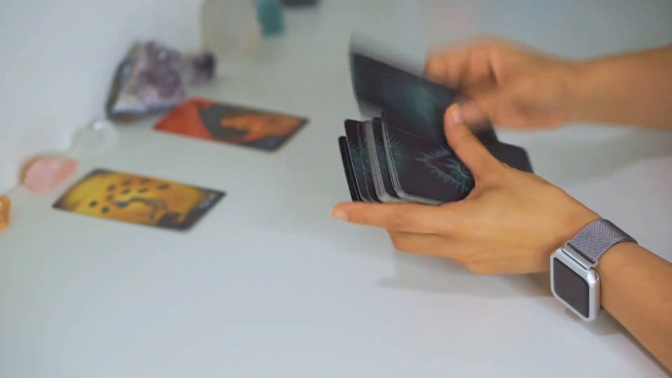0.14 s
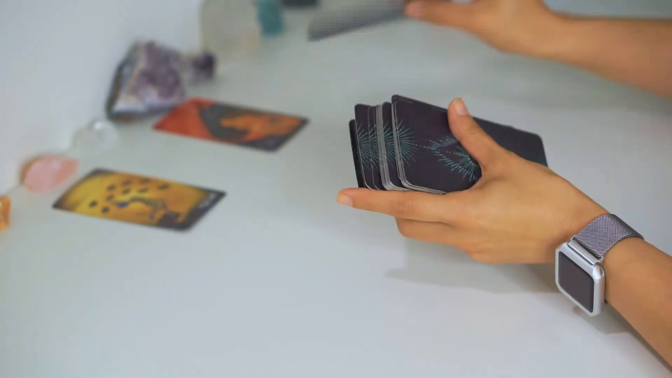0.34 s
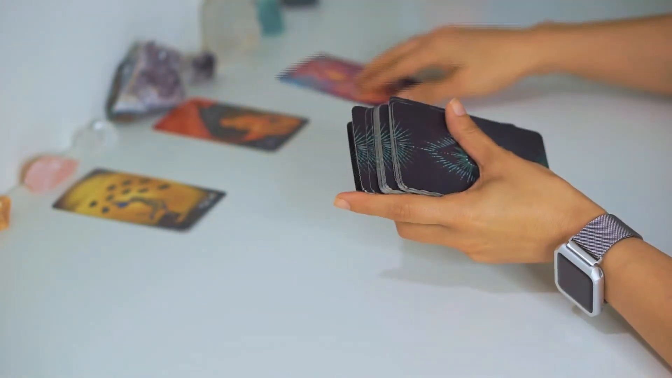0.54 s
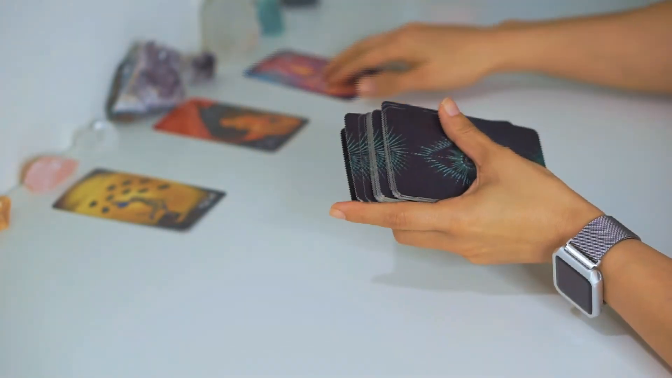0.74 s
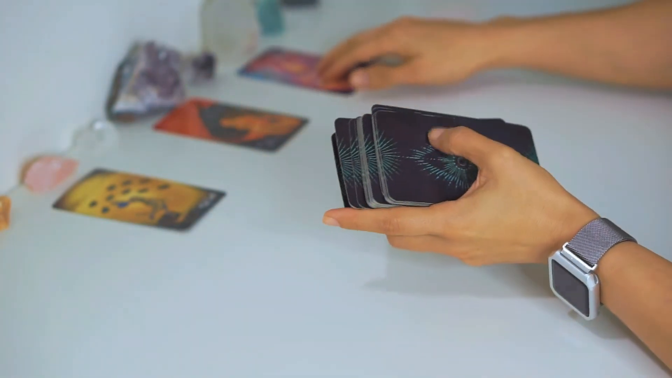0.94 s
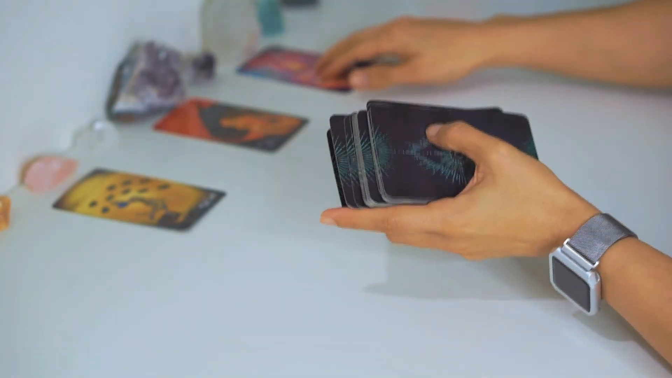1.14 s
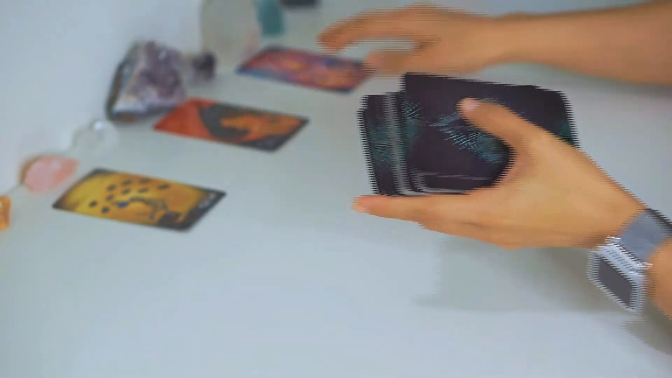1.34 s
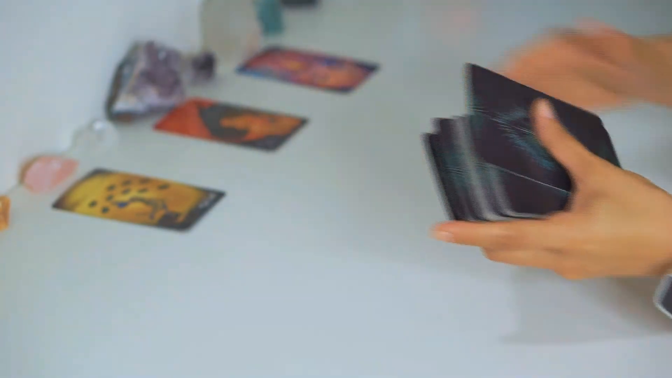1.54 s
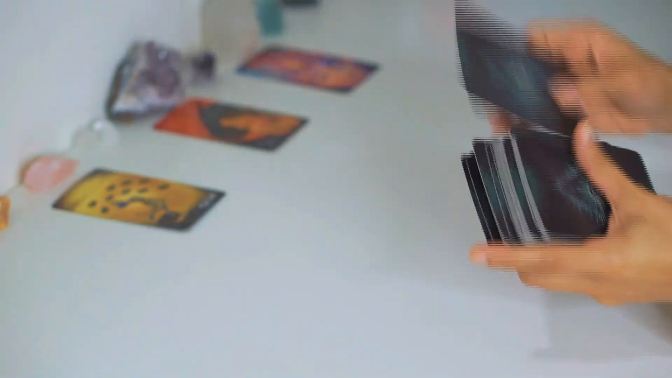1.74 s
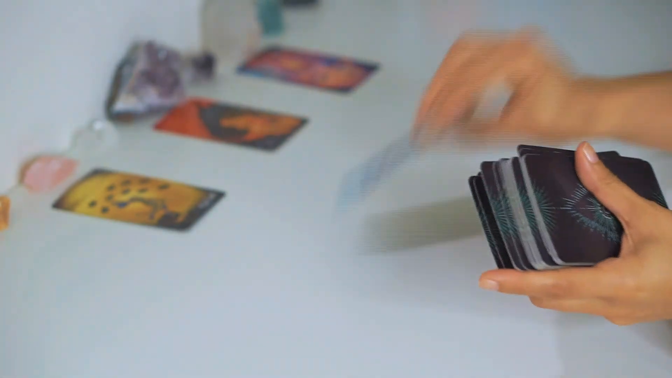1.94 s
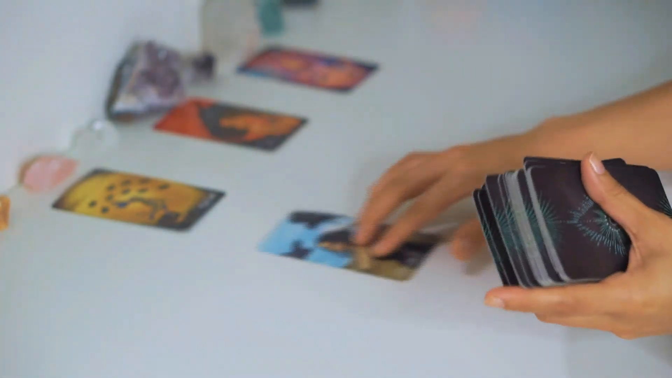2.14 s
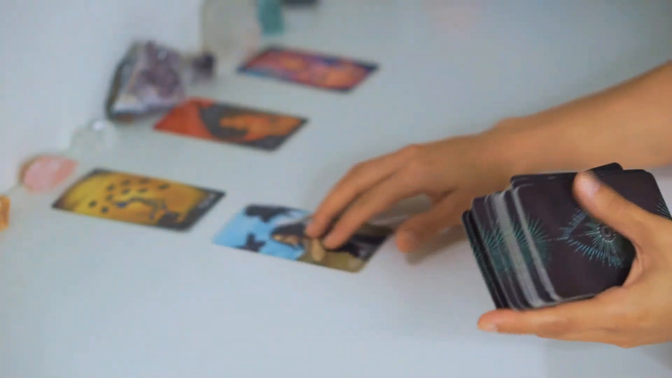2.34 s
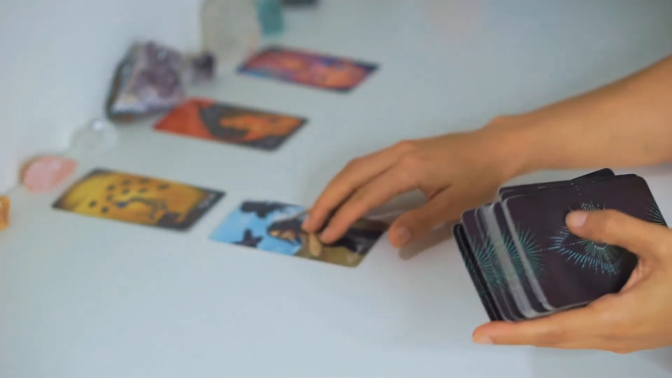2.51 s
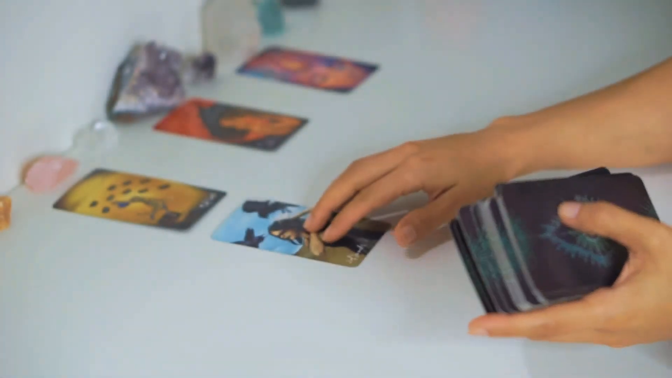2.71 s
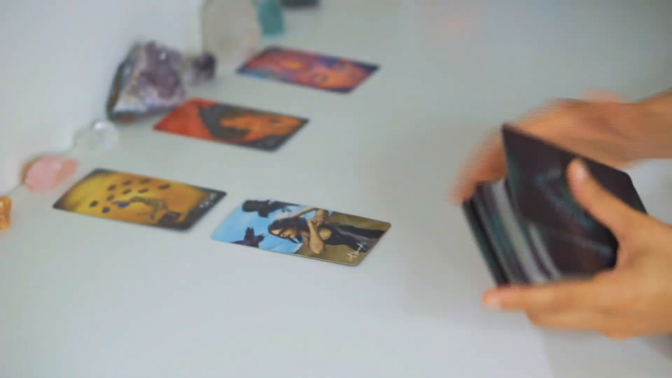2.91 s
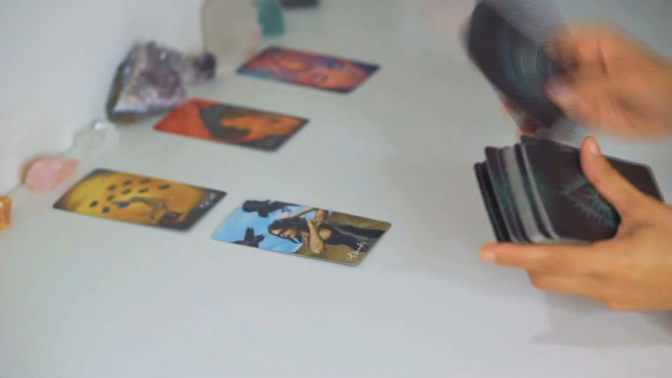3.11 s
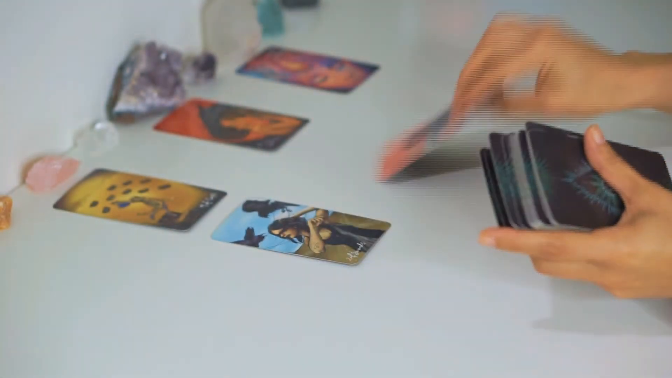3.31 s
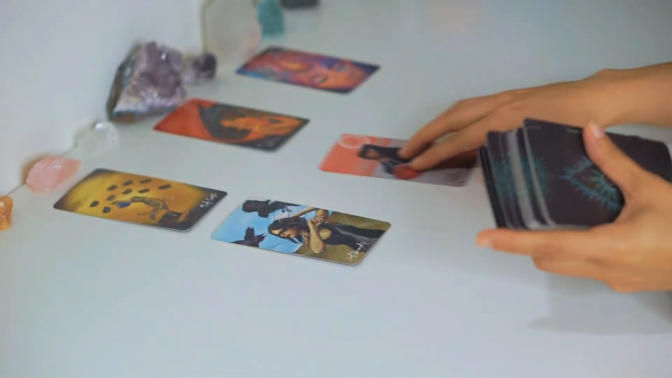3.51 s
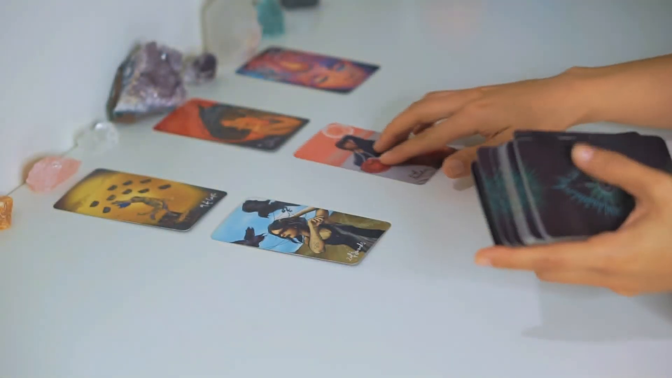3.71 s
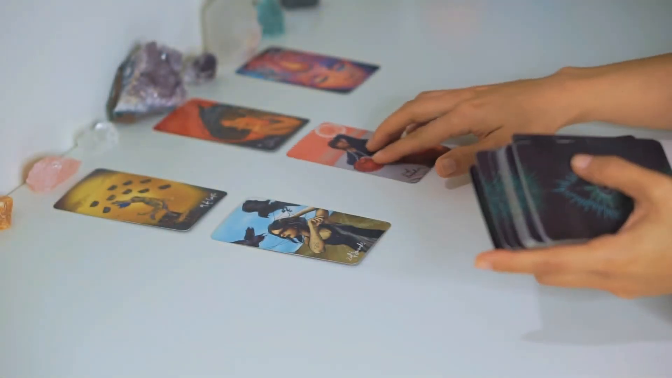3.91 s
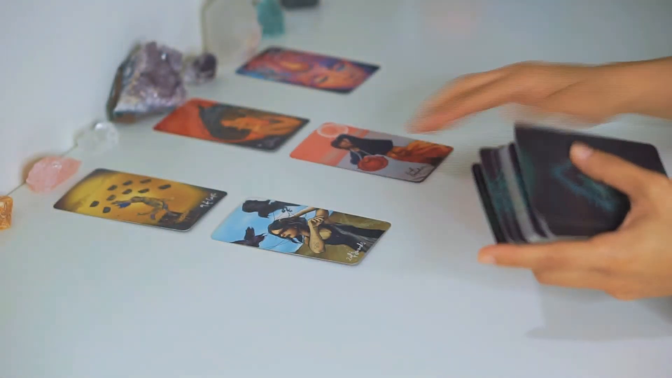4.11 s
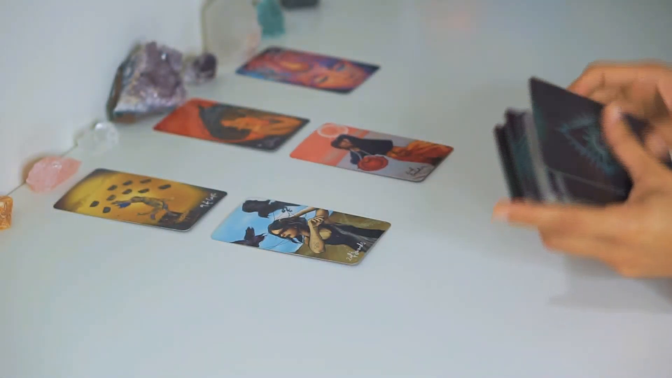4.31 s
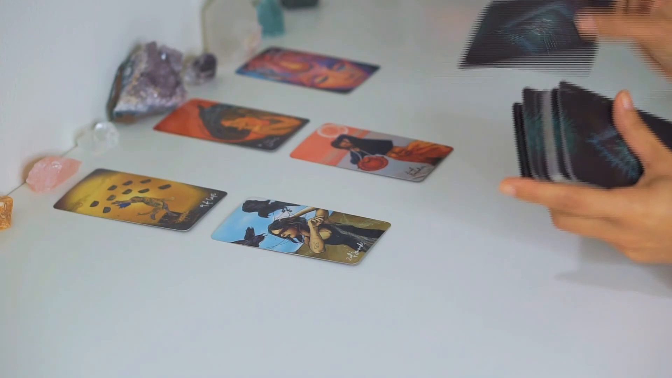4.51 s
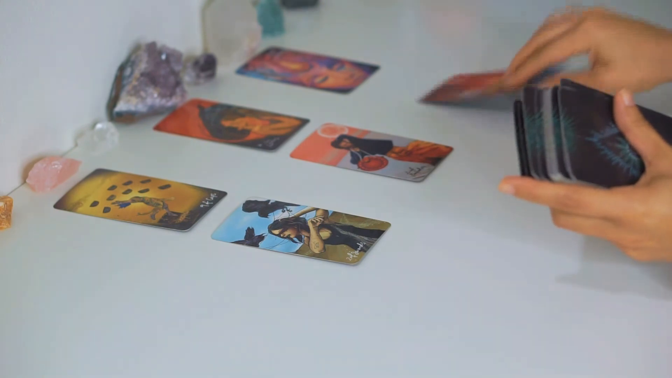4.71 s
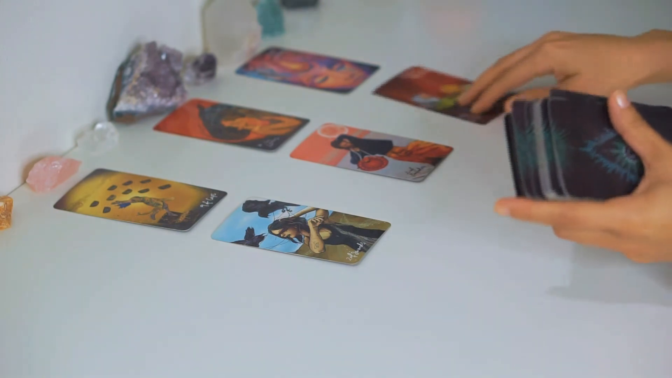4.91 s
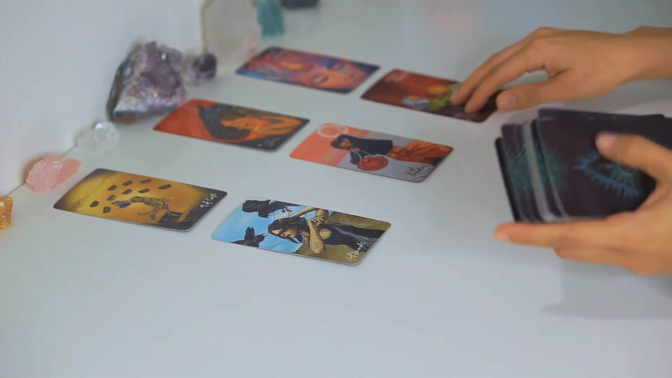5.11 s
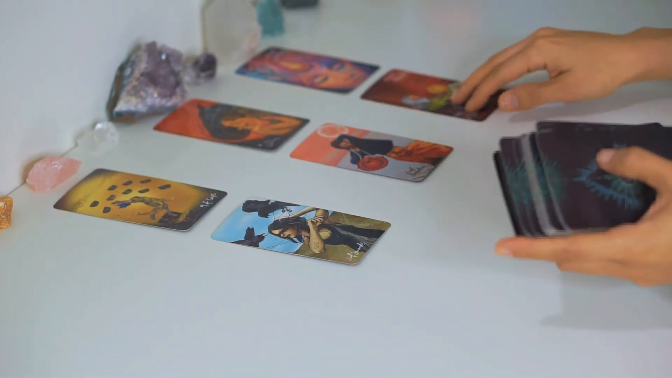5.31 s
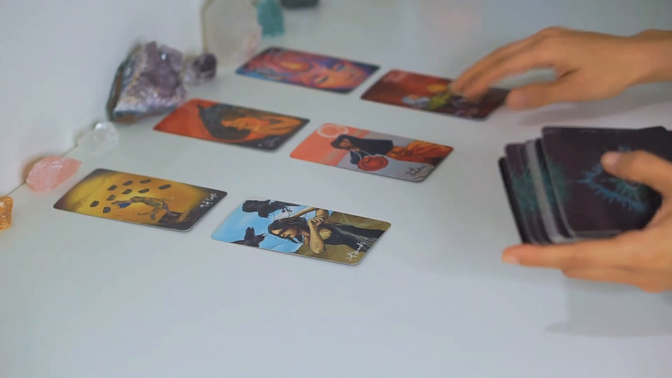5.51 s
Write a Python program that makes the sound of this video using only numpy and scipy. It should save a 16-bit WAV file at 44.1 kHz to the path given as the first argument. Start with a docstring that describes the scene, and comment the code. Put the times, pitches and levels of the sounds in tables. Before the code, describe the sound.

In a small, bare, quiet room, a hand deals four stiff cards from a deck. Each hisses briefly off the stack, snaps sharply free, then lands a quarter second later with a slap on a hard table and is slid softly into place. Soft low thuds come from the tabletop under the hand. Close, mono microphone; short noisy echoes, faint rumble and hiss behind.

```python
"""Cards are dealt one by one onto a hard table in a small, bare, quiet room.
Each card hisses off the deck, snaps free of the thumb, slaps down and is slid into place.
Snaps and slaps are short cracks of noise, hisses are grainy noise, whistles are narrow bands of noise.
The table top booms softly in low sine tones under the hand, and noisy echoes answer the cards.
A low rumble and a faint, even hiss lie behind it all."""
import sys
import numpy as np
from scipy import signal
from scipy.fft import rfft, irfft, next_fast_len
from scipy.io import wavfile
from scipy.ndimage import uniform_filter1d, map_coordinates

SR = 44100
rng = np.random.default_rng(int(sys.argv[2]) if len(sys.argv) > 2 else 0)


def waveform_to_disk(signal):
    """Save audio, clipped to [-1, 1], as 16-bit WAV at the path in sys.argv[1]."""
    frames = np.transpose(np.atleast_2d(signal))
    scaled = np.clip(frames, -1, 1) * 32767
    samples = np.round(scaled).astype(np.int16)
    wavfile.write(sys.argv[1], SR, samples)


N = 244755

# a card is drawn off the deck: start t/s, end t/s, hiss at full speed before mixing/dB, first touch level/dB
PULLS = [(.257, 0.373, -46.5, -71), (1.835, 1.952, -41.5, -83.5), (3.182, 3.303, -42, -72),
         (4.48, 4.616, -44.5, -64.5)]
# a card lands, edge first and then flat: t/s, level/dB, treble/dB, time from edge to flat/s
TAPS = [(0.624, -47.5, -8, 0.0031), (2.191, -40, -2, .0055), (3.511, -47, -4, .002),
        (4.8572, -41.5, 0, .002)]
# fingers press the landed card and push it into place:
# press t/s, stop t/s, press level/dB, hiss before mixing/dB, whistle f/Hz
SLIDES = [(.709, 0.942, -47.5, -56, 2858), (2.282, 2.567, -48.5, -51.5, 4420),
          (3.604, 3.904, -46.5, -51.5, 4350), (4.985, 5.122, -58.5, -58, 3720)]


def amp(db):
    """Turn decibels into a plain multiplier."""
    return 10 ** (np.asarray(db) / 20)


def unit(x):
    """Scale a sound to an average (RMS) strength of 1."""
    return x / np.sqrt(np.mean(x ** 2) + 1e-20)


def along(points, hz):
    """Read a curve of (f/Hz, value) points, drawn on a logarithmic frequency axis."""
    f, v = np.transpose(points)
    return np.interp(np.log(hz + 1), np.log(f + 1), v)


def bumps(peaks, hz):
    """Add up the gains in dB of resonances given as (f/Hz, width/Hz, gain/dB)."""
    return sum(db / (1 + (2 * (hz - centre) / width) ** 2) for centre, width, db in peaks)


def coloured(x, gain_db):
    """Filter x with the gain gain_db(hz), without any sound arriving early."""
    size = 2 * next_fast_len(len(x) // 2 + 4096)
    log_gain = np.log(amp(gain_db(np.fft.rfftfreq(size, 1 / SR))))
    # folding the cepstrum forward in time gives the minimum-phase filter
    cepstrum = irfft(log_gain)
    cepstrum[1:size // 2] *= 2
    cepstrum[size // 2 + 1:] = 0
    response = np.exp(rfft(cepstrum))
    return irfft(rfft(x, size) * response, size)[:len(x)]


def levelled(x, order=150):
    """Even out the broad humps of a sound's spectrum, smoothing over order bins."""
    power = np.abs(uniform_filter1d(np.abs(rfft(x)) ** 2, order)) + 1e-12
    bins_hz = np.fft.rfftfreq(len(x), 1 / SR)
    return coloured(x, lambda hz: np.interp(hz, bins_hz, -10 * np.log10(power)))


def add(track, s, sound):
    """Mix a sound into the track from time s."""
    part = track[round(s * SR):][:len(sound)]
    part += sound[:len(part)]


def wobble(rate, size):
    """Draw a smooth random curve through rate random points a second."""
    points = rng.standard_normal(int(size * rate / SR) + 4)
    return map_coordinates(points, [np.arange(size) * rate / SR])


def cards():
    """Each card snaps, is touched, lands and is pressed: every contact cracks, coloured by resonances."""
    # a card catches and snaps free: t/s, level/dB, body/dB, treble/dB, crack over room/dB, attack/s
    snaps = [(0.335, -42, 11.5, 1, 2.5, .0005), (0.3853, -23, 0, 0, -0.5, 0.00056),
             (1.89, -33, -1, -4, 9, 0.0021), (1.9525, -28, 1.5, -1.5, 4, 0.0021),
             (3.2988, -26.5, -1.5, -9, 1, 0.0013), (4.568, -43, 9, 3.5, -2.5, 0.0017),
             (4.6123, -23.5, 1, 3.5, -4.5, .0002)]
    # colour of a snap: f/Hz, level/dB
    snap_colour = [(60, -36), (110, -18.5), (160, -8), (220, -5.5), (350, -2), (600, -3.5), (1000, -5),
                   (2000, -7.5), (3200, -11.5), (5500, -15.5), (8000, -17), (10000, -23), (13500, -22),
                   (16000, -29)]
    # resonances heard with the deck: f/Hz, width/Hz, gain/dB
    deck = [(362, 58, 5), (500.4, 30, -8.5), (610, 71, 4.5), (895.6, 160, -5.5), (1040, 62, 2.5),
            (1340, 74, 3.5), (1537, 110, -9.5), (1820, 130, 5.5), (2184, 130, 3.5), (8000, 1600, -2.5)]
    # each card is bent differently, so each snap has its own resonances: f/Hz, width/Hz, gain/dB
    bend_1 = [(1170, 51, -5), (2052, 121, -7.5), (8312, 831, 7.5)]
    bend_2 = [(319, 21, 8.5), (434, 34, 2.5), (594, 93, -8.5), (852, 15, 12.5), (1394, 31, 8.5),
              (2750, 280, -5), (3329, 570, 2.5), (6200, 1600, 4)]
    bend_3 = [(230, 160, -5), (367, 71, -14.5), (530, 260, 8), (714, 130, 10), (913, 64, 7), (1010, 60, -3),
              (4370, 500, 7.5)]
    bend_4 = [(297, 25, 8.6), (473, 29, 3.6), (627, 82, 4.5), (1272, 130, 3.6), (1730, 220, 3.9),
              (2818, 280, 6.0), (3830, 960, 8.9), (5530, 280, 6)]
    bend_5 = [(392, 12, 5.5), (558, 48, 3.5), (905, 63, -9), (1000, 39, 8), (1085, 100, -4.5),
              (1620, 95, 5), (1934, 303, 3.5), (3395, 240, 3.5)]
    bend_6 = [(225, 33, 16.5), (308, 40, -12), (8181, 818, 7)]
    bend_7 = [(179.4, 25, -7.5), (214, 43, 8), (274.7, 25, -10), (538, 34, 7.5), (1060, 51, 7.5),
              (1408, 170, -2), (2180, 240, 3), (5470, 1000, 3)]
    bends = [bend_1, bend_2, bend_3, bend_4, bend_5, bend_6, bend_7]
    # colour of the other contacts: f/Hz, level/dB
    tap_colour = [(70, -13), (120, -14), (180, -4.5), (320, -1.5), (600, -3.5), (1200, -5.5), (2300, -6.5),
                  (4000, -12.5), (7500, -17), (10000, -23), (14000, -27), (16000, -33)]
    # resonances heard with the table top: f/Hz, width/Hz, gain/dB
    top = [(170.5, 35, -1.5), (300, 18, 13), (416, 42, 4), (796, 73, -0.85), (896, 75, -5.5),
           (1063, 160, 3), (1482, 36, 4), (1977, 1200, 0.5), (2880, 1700, 3.5), (8550, 858, -1.5)]
    # a finger knocks and scuffs on a card: t/s, level/dB
    knocks = [(1.985, -39.5), (2.348, -62), (3.624, -52.5)]
    edge_share = 0.82  # share of the treble setting that already applies at 4700 Hz
    track = np.zeros(N)

    def tap(db, **touch):
        """A contact heard with the table top."""
        return blow(tap_colour, top, db, **touch, build_s=0.0022, grain_db=2, crinkle_db=-11.0,
                    ripple_db=3.0)

    for (s, db, body_db, treble_db, crack_db, attack_s), bend in zip(snaps, bends):
        add(track, s, blow(snap_colour, [*deck, *bend], db, body_db, edge_share * treble_db, treble_db,
                           crack_db, crack_s=0.0033, attack_s=attack_s, build_s=0.0047,
                           grain_db=0.5, crinkle_db=-6, ripple_db=3.0))
    # first touch of each pull
    for s, _, _, db in PULLS:
        add(track, s, tap(db, body_db=-2.5, edge_db=3.0, air_db=12.5,
                          crack_db=6, crack_s=.002, attack_s=0.00065))
    # landing: first the edge, then the flat card
    for s, db, treble_db, flat_s in TAPS:
        colour = dict(body_db=-1.2, edge_db=edge_share * treble_db, air_db=treble_db)
        add(track, s, tap(db, **colour, crack_db=1.5, crack_s=.0025, attack_s=0.0011))
        add(track, s + flat_s, tap(db, **colour, crack_db=7, crack_s=.0012, attack_s=0.00068))
    # fingers press the card
    for s, _, db, _, _ in SLIDES:
        add(track, s, tap(db, body_db=6.5, edge_db=4, air_db=7.5,
                          crack_db=-7, crack_s=0.0054, attack_s=0.0052))
    for s, db in knocks:
        add(track, s, tap(db, body_db=14.5, edge_db=15, air_db=4.5,
                          crack_db=4.0, crack_s=0.0022, attack_s=0.002))
    return track


def blow(spectrum, peaks, db, body_db, edge_db, air_db, crack_db, crack_s, attack_s, build_s,
         grain_db, crinkle_db, ripple_db):
    """A short crack, then the room; edge_db and air_db set how bright each contact sounds."""
    echoes = tail()
    t = np.arange(len(echoes)) / SR
    # the first echoes arrive in clumps, and merge as they multiply
    clumps = wobble(800, len(t)) + 0.42 * wobble(160, len(t))
    echoes *= amp(grain_db * clumps * np.exp(-t / 0.12))
    echoes *= 1 - np.exp(-t / build_s)
    crack = amp(crack_db) * np.exp(-(t / (2 * crack_s)) ** 2) * rng.standard_normal(len(t))
    # a chatter of single ticks, about 400 a second and fading
    ticks = (rng.random(len(t)) < 400 / SR) * rng.uniform(-1, 1, len(t))
    crack += amp(crinkle_db) * unit(ticks) * np.exp(-t / 0.03)
    # the direct sound is brighter than the echoes
    bright = [(200, -6.5), (1200, -1.5), (4000, 6.5), (12000, 5.0)]
    crack = coloured(crack, lambda hz: along(bright, hz))
    sound = levelled((crack + echoes) * (1 - np.exp(-t / attack_s)))
    touch = [(400, body_db), (1300, 0), (2300, 0), (4700, edge_db), (10000, air_db)]
    # a random ripple varies the colour of each contact
    ripple_hz = 700 + np.cumsum(rng.uniform(.5, 1.5, size=70) * np.linspace(40, 300, num=70))
    heights_db = ripple_db * np.pad(rng.standard_normal(len(ripple_hz) - 2), 1)
    ripple = np.column_stack([ripple_hz, heights_db])

    def colour_db(hz):
        """All the colours of this contact together."""
        return along(spectrum, hz) + along(touch, hz) + bumps(peaks, hz) + along(ripple, hz)

    sound = coloured(sound, colour_db)
    return amp(db) * sound / np.std(sound[:SR // 22])  # level of the first 45 ms


def tail():
    """The room's answer to a click: dense echoes, each frequency dying at its own speed."""
    # how long echoes take to fall by 60 dB: f/Hz, time/s
    room = [(100, 0.53), (260, 0.16), (700, 0.35), (1840, 0.35), (4850, 0.37), (12800, .31)]
    hz, t, z = signal.stft(rng.standard_normal(SR * 3 // 4), SR, nperseg=256)
    fading = amp(-60 * t / along(room, hz)[:, None])
    return signal.istft(z * fading, SR, nperseg=256)[1]


def friction():
    """Cards rub off the deck and along the table, the hand rubs the deck, and slow rubbing sings."""
    # colours of the hisses: f/Hz, level/dB
    pull_colour = [(150, -4), (400, 0.5), (1200, -7.5), (2300, 1.5), (4000, -0.5), (8000, -1.5), (13000, 0),
                   (16000, -3)]
    slide_colour = [(200, -4), (700, -19), (1700, -25), (2500, -8.5), (4500, -1), (8000, -0.5), (10000, -5),
                    (14000, -4.5), (16000, -10.5)]
    grip_colour = [(70, -26), (150, -9), (230, 1), (300, 3.5), (430, -3), (600, -7.5), (1200, -11),
                   (2200, -18), (3200, -21), (3750, -39), (4400, -29.5), (5800, -29.5), (7000, -35),
                   (16000, -39)]
    brush_colour = [(2000, -26), (5000, -8), (8000, -6), (10000, -3), (14500, 2), (16000, -2)]
    # the palm shifts its grip on the deck: start t/s, end t/s, first and last level before mixing/dB
    grips = [(1.36, 1.39, -67.5, -53), (1.391, 1.425, -40, -47)]
    # the thumb brushes the top card: start t/s, end t/s, first and last level before mixing/dB
    brushes = [(2.98, 3.035, -80, -74), (3.04, 3.1, -78.5, -87)]
    track = rub(pull_strokes(), pull_colour, grain_db=1.0, room_db=-2.5, fade_s=.006)
    track += rub(slide_strokes(), slide_colour, grain_db=2.0, room_db=-6.0, fade_s=0.026)
    track += rub(grips, grip_colour, grain_db=4.0, room_db=-3.5, fade_s=0.0067)
    track += rub(brushes, brush_colour, grain_db=4.0, room_db=-1.5, fade_s=.01)
    return track + whistles()


def pull_strokes():
    """Each card's hiss grows as it speeds up on the deck, then holds until the card is free."""
    rise_db, hold_s = 24, .028
    for start, end, db, _ in PULLS:
        yield start, end - hold_s, db - rise_db, db
        yield end - hold_s, end, db, db


def slide_strokes():
    """Each card glides from its landing until the fingers press it, then is pushed ever more slowly."""
    glide_db = -2.5  # free glide relative to the push
    slowing_db_per_s = 19  # fading of the push
    grab_s = 0.0088  # lag from touch to hiss, and gap before the press
    for (lands, *_), (press, stop, _, db, _) in zip(TAPS, SLIDES):
        yield lands + grab_s, press - grab_s, db + glide_db, db + glide_db
        yield press + grab_s, stop, db, db - slowing_db_per_s * (stop - press)


def rub(strokes, spectrum, grain_db, room_db, fade_s):
    """Card stock rubs: a grainy hiss that follows each stroke, heard with the room."""
    track, t = np.zeros(N), np.arange(SR) / SR
    for start, end, first_db, last_db in strokes:
        length = max(end - start, .01)
        fibres = amp(grain_db * wobble(700, SR)) * rng.standard_normal(SR)
        hiss = unit(coloured(fibres, lambda hz: along(spectrum, hz)))
        hiss *= amp(np.interp(t, [0, length], [first_db, last_db]))
        hiss *= np.exp(-np.maximum(t - length, 0) / fade_s)
        echoes = tail()
        add(track, start, amp(-4.5) * hiss)
        answer = signal.fftconvolve(hiss, echoes / np.linalg.norm(echoes))
        add(track, start, amp(room_db) * answer)
    return track


def whistles():
    """Cards sing when they move slowly: as a pull starts, as a slide ends, and under a shifting finger."""
    # a finger squeaks briefly on card: peak t/s, level before the singing trim/dB, f/Hz, width/Hz
    squeaks = [(1.16, -82, 2750, 900), (1.399, -65.5, 3130, 450), (1.815, -79, 4900, 300),
               (2.295, -50, 3424, 600), (2.705, -67, 4540, 900), (2.949, -83, 5160, 250),
               (4.21, -73.5, 3660, 2000)]
    card_hz, card_width_hz = 2300, 240  # the card's own note under slow friction
    lead_s = .025  # the whistle is strongest just before the card stops
    track = np.zeros(N)
    for start, *_ in PULLS:
        track += sing(start + .02, -70.5, card_hz, card_width_hz, swell_s=0.02, fade_s=0.041)
    for _, stop, _, _, hz in SLIDES:
        track += sing(stop - lead_s, -67, hz, width_hz=480, swell_s=0.11, fade_s=.072)
        track += sing(stop - lead_s, -75.5, card_hz, card_width_hz, swell_s=.06, fade_s=0.053)
    for s, db, hz, width_hz in squeaks:
        track += sing(s, db, hz, width_hz, swell_s=0.016, fade_s=0.03)
    return track


def sing(s, db, centre_hz, width_hz, swell_s, fade_s):
    """Slow friction feeds one resonance of the card, which swells unevenly up to time s and fades."""
    track, t = np.zeros(N), np.arange(SR) / SR
    start = max(s - .5, 0)
    age = start + t - s  # negative before the peak

    def resonance_db(hz):
        """A single peak around the note."""
        return -20 * np.log10(1 + (2 * (hz - centre_hz) / width_hz) ** 2)

    band = coloured(rng.standard_normal(SR), resonance_db)
    band = unit(band * amp(2 * wobble(50, SR)))
    swell = np.exp(-(age / np.where(age < 0, swell_s, fade_s)) ** 2 / 2)
    add(track, start, amp(db - 1.5) * band * swell)  # -1.5 dB trims all the singing
    return track


def table():
    """The top swings in its lowest modes under each landing card and the soft weight of the hand."""
    # the hand bumps the table top: t/s, level before a 1 dB trim and the envelope/dB, f/Hz
    thuds = [(.742, -27.5, 74.8), (0.786, -26.5, 72.2), (1.433, -40.5, 90.2), (1.976, -40.5, 66),
             (2.278, -35.5, 62), (3.637, -41, 72.6), (4.449, -39.5, 83.6), (4.536, -40.5, 80.6),
             (4.919, -37.5, 81.6), (5.233, -51, 91)]
    swell_s, t60_s = .01, 0.29  # time to build up; time to fall by 60 dB
    track, t = np.zeros(N), np.arange(SR) / SR
    # each landing sets the top swinging at 92.2 Hz, 1 dB over its tap setting before the trim
    landings = [(s, db + 1, 92.2) for s, db, *_ in TAPS]
    envelope = (1 - np.exp(-t / swell_s)) * np.exp(-np.log(1000) * t / t60_s)
    for s, db, hz in thuds + landings:
        swing = np.sin(2 * np.pi * hz * t) + amp(-11) * np.sin(2 * np.pi * 1.3 * hz * t)
        add(track, s, amp(db - 1) * swing * envelope)
    return track


def background():
    """A restless low rumble of the table top under a faint, even hiss, both made of filtered noise."""
    # colour of the quiet room: f/Hz, level/dB
    still = [(22, -20.5), (45, -8.5), (90, -6.5), (150, -14.5), (260, -18.5), (600, -27.5), (1300, -31),
             (2700, -37), (4000, -40.5), (8000, -47.5), (12500, -50), (16000, -62)]
    # colour of the table top's low rumble: f/Hz, level/dB
    rumble_colour = [(25, -26.5), (45, -10.5), (60, 0.5), (90, 0.5), (125, -6.5), (200, -28.5), (600, -71)]
    # the rumble as the arms move on the table top: t/s, level before a 0.9 dB lift and the wobble/dB
    shake = [(0.0, -62.5), (0.62, -67.5), (0.74, -62.5), (1.87, -64), (2.19, -56.5), (2.6, -66),
             (3.03, -62.5), (4.31, -67), (4.61, -57.5), (4.87, -57.5), (5.25, -67.5), (5.55, -72)]
    air = unit(coloured(rng.standard_normal(N), lambda hz: along(still, hz)))
    rumble = unit(coloured(rng.standard_normal(N), lambda hz: along(rumble_colour, hz)))
    shake_db = np.interp(np.arange(N) / SR, *np.transpose(shake))
    return amp(-67.5) * air + amp(shake_db + 0.9 + 1.3 * wobble(3.3, N)) * rumble


def scene():
    """All the sources together, as one channel."""
    return (cards() + friction() + table() + background())[None]


def record(dry):
    """Round the tallest peaks, then fade out everything above the band limit."""
    top_hz = 16000  # middle of a 300 Hz wide slope
    rounded = dry / (1 + (dry / .3) ** 4) ** .25
    size = next_fast_len(N + SR // 2)
    passed = np.clip((top_hz - np.fft.rfftfreq(size, 1 / SR)) / 300 + .5, 0, 1)
    return irfft(rfft(rounded, size) * np.sin(np.pi / 2 * passed) ** 2, size)[:, :N]


dry = scene()
out = record(dry)
waveform_to_disk(out)
```